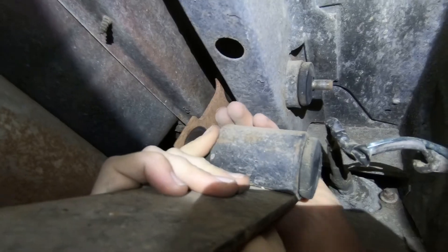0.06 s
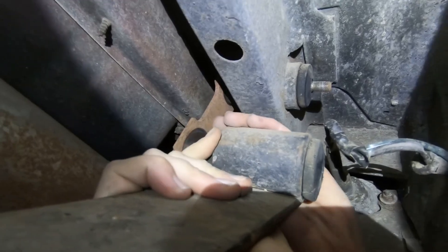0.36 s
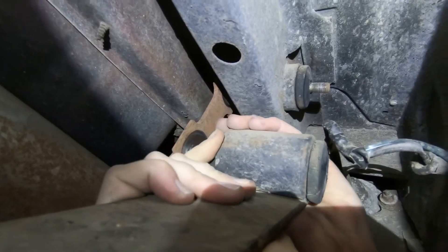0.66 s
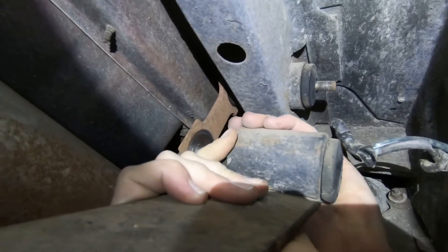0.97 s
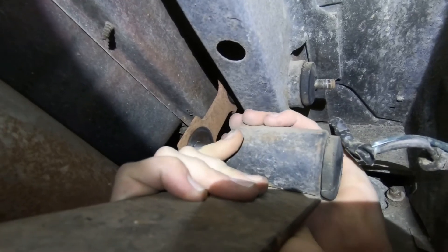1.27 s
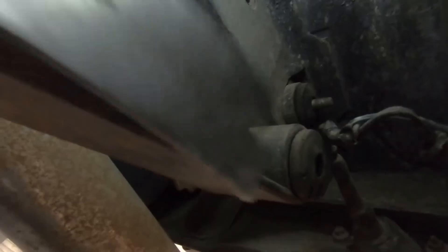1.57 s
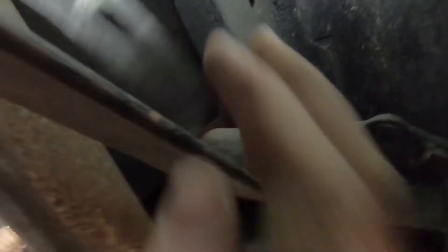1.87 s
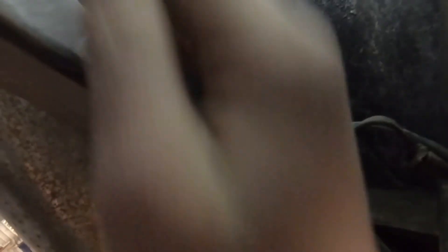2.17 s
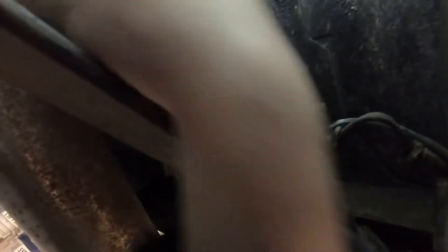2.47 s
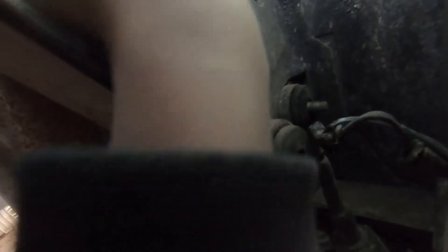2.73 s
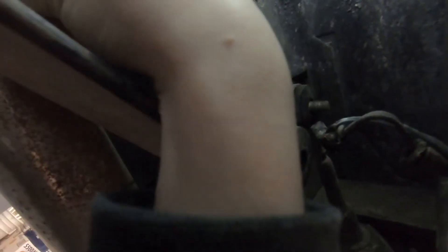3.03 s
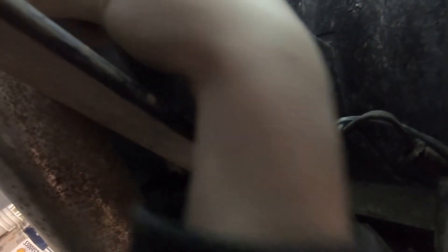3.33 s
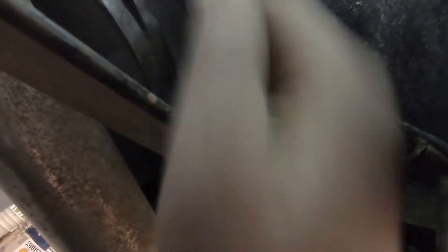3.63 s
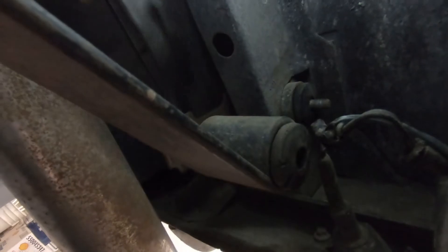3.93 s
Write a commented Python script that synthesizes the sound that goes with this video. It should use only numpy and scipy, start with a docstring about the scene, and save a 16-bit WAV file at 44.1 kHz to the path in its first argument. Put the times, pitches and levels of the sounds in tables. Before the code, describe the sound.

A rubber-mounted metal part creaks close by, louder on the right, in raspy bursts with soft thuds around 0.3 and from 0.6 to 1 second, then trails off. At 1.6 seconds the sound turns centred, with a dull garage rush and a clear, slowly fading tone. Steel clanks near 1.7, 1.9, 2.2 and 2.5 seconds, and thin, squeaky scrapes come and go until about 4 seconds.

```python
"""Under a car in a garage, hands twist a rubber-mounted metal part. Stick-slip friction makes it creak
in bursts, louder on the right, and it thuds against its bracket. Then the scene jumps to a louder, mono
stretch: steel parts scrape and clank, their modes driven by friction and impact, over the dull rush
of the garage, while one clear tone slowly dies away."""
import sys
import numpy as np
from scipy import signal
from scipy.fft import rfft, irfft, next_fast_len
from scipy.io import wavfile
from scipy.ndimage import uniform_filter1d, map_coordinates

SR = 44100
rng = np.random.default_rng(int(sys.argv[2]) if len(sys.argv) > 2 else 0)


def store_wav(level_fs):
    """Save 16-bit WAV to argv[1]."""
    pcm = np.round(np.clip(np.atleast_2d(level_fs), -1, 1) * 32767)
    wavfile.write(sys.argv[1], SR, pcm.T.astype(np.int16))


N = 176400

CUT_S, CUT_FADE_S = 1.593, 0.01  # where the second stretch begins
# spectrum of the rasp that one slip excites: f/Hz, level/dB
RASP_SPECTRUM = [(650, -54), (1100, -19.5), (1360, -16.5), (1530, -6.5), (1670, -15.5), (1810, -13.5),
                 (2080, -1), (2320, -3), (2580, -11.5), (2840, -2), (3500, -0.5), (3980, -3), (4250, -9.5),
                 (5180, -3.5), (5500, 2.5), (7900, -17), (8500, -34.5), (8800, -56.5), (12500, -84.5)]


def amp(db):
    """Decibels to amplitude ratio."""
    return 10 ** (np.asarray(db) / 20)


def unit(x):
    """Scale to rms 1."""
    return x / np.sqrt(np.mean(x ** 2) + 1e-20)


def along(points, hz):
    """Interpolate (f/Hz, value) points on a logarithmic frequency axis."""
    f, v = np.transpose(points)
    return np.interp(np.log(hz + 1), np.log(f + 1), v)


def curves(rows):
    """Interpolate each column after t/s to one value per sample."""
    s, *cols = np.transpose(rows)
    return [np.interp(np.arange(N) / SR, s, c) for c in cols]


def wobble(rate):
    """Smooth random modulation with rate knots a second."""
    return map_coordinates(rng.standard_normal(int(N * rate / SR) + 4), [np.arange(N) * rate / SR])


def filtered(x, gain):
    """Minimum-phase filter: folding the cepstrum makes the response gain(f) causal."""
    m = 2 * next_fast_len(x.shape[-1] // 2 + 4096)
    cepstrum = irfft(np.log(np.maximum(gain(np.fft.rfftfreq(m, 1 / SR)), 1e-6)), m)
    cepstrum[..., 1:m // 2] *= 2
    cepstrum[..., m // 2 + 1:] = 0
    return irfft(rfft(x, m) * np.exp(rfft(cepstrum)), m)[..., :x.shape[-1]]


def coloured(x, points):
    """Spectral shaping by (f/Hz, level/dB) points, rolled off beyond their ends, at rms 1."""
    skirts = lambda hz: 1 / (1 + (points[0][0] / (hz + 1) / 1.3) ** 6 + (hz / points[-1][0] / 1.3) ** 6)
    return unit(filtered(x, lambda hz: amp(along(points, hz)) * skirts(hz)))


def add(track, s, x):
    """Superpose x on the track at time s."""
    i = round(s * SR)
    n = min(x.shape[-1], N - i)
    track[..., i:i + n] += x[..., :n]


def handling(tone_hz):
    """Friction noise of skin on the part, over the quiet garage and its faint tone."""
    # the room's background: t/s, level/dB; its spectrum: f/Hz, level/dB
    room_levels = [(0, -49.5), (.25, -53), (.5, -48), (1.15, -54), (1.6, -54)]
    room_spectrum = [(110, -43), (230, 1), (310, -2), (410, -6), (550, -18.5), (720, -13), (860, -19),
                     (1300, -17), (1800, -28), (3500, -35)]
    # rubbing hands: t/s, level/dB; their spectrum: f/Hz, level/dB
    rub_levels = [(0, -57.5), (.22, -56), (.42, -51), (.58, -54.5), (.9, -54), (1.14, -66.5), (1.25, -62),
                  (1.36, -71.5), (1.475, -54), (1.51, -69), (1.6, -70.5)]
    rub_spectrum = [(500, -19.5), (1450, 0.5), (1650, -2.5), (2020, 5), (2400, -2), (3800, -7.5),
                    (5200, -6), (5750, -1), (6700, -9.5), (9000, -34)]
    room_noise = rng.standard_normal((2, N)) + 0.54 * rng.standard_normal(N)  # partly coherent
    room = amp(curves(room_levels)[0]) * coloured(room_noise, room_spectrum)
    rub_db = curves(rub_levels)[0] + 1.4 * wobble(90)
    rub = amp(rub_db) * coloured(rng.standard_normal((2, N)), rub_spectrum)
    return room + rub + amp(-63) * np.sin(2 * np.pi * tone_hz * np.arange(N) / SR)


def diffuse(t60, incoherence=0.64):
    """Diffuse field: spectrally flat decaying noise of energy near 1, much alike left and right."""
    t = np.arange(SR // 3) / SR
    noise = rng.standard_normal(len(t)) + incoherence * rng.standard_normal((2, len(t)))
    spectrum = rfft(noise * amp(-60 * t / t60))
    spectrum /= np.sqrt(uniform_filter1d(np.abs(spectrum) ** 2, size=90, axis=1))
    tail = irfft(spectrum, len(t)) * np.clip((t[-1] - t) / t[-1], 0, 1) ** 2
    return tail / np.linalg.norm(tail[0])


def ringing(modes, t, scatter_db=1):
    """Free vibration of damped modes (f/Hz, level/dB, T60/s), excited a little differently each time."""
    return sum(amp(db + scatter_db * rng.standard_normal() - 60 * t / t60) * np.sin(2 * np.pi * hz * t)
               for hz, db, t60 in modes)


def slip_response(spectrum, t60, modes=(), mode_t60=0.054):
    """Impulse response to one slip: a direct click, the underbody's echo and any modes of the part."""
    response = diffuse(t60) + amp(-14) * diffuse(t60=0.21)
    t = np.arange(response.shape[1]) / SR
    response[:, 0] += 0.64  # the click reaches both sides alike
    if modes:
        ring = unit(ringing([(hz, db, mode_t60) for hz, db in modes], t))
        response += amp(-17) * ring / np.sqrt(len(t))
    return coloured(response, spectrum) / np.sqrt(len(t))


def creaks(jitter=0.4, scatter_db=2.5):
    """Stick-slip friction: uneven impulse trains from the rubber make the part rasp and groan."""
    # bursts of slipping: t/s, length/s, rasp level/dB, groan level/dB
    bursts = [(0.272, 0.0024, -41, -53), (0.282, 0.0071, -38.5, -43), (0.295, 0.0083, -30.5, -46),
              (.307, 0.014, -19.5, -30.5), (0.326, 0.0038, -22, -34.5), (.333, 0.012, -33, -35.5),
              (0.346, 0.016, -18.5, -34.5), (0.36, 0.0064, -27, -36), (0.371, 0.0094, -44.5, -34),
              (0.614, 0.0039, -32, -40.5), (0.6284, 0.005, -19, -27.5), (0.635, 0.0083, -21.5, -31),
              (0.644, 0.013, -23.5, -31.5), (0.66, 0.0099, -18, -28), (0.671, 0.016, -15.5, -34.5),
              (0.691, 0.006, -24, -33), (0.701, 0.022, -34.5, -37.5), (0.718, 0.0016, -32.5, -47),
              (0.7826, .004, -16, -38.5), (0.789, 0.0056, -26.5, -43.5), (0.8004, 0.0037, -13.5, -37),
              (0.825, .011, -23, -40.5), (0.945, 0.0039, -22.5, -36.5), (0.99, 0.018, -41.5, -49),
              (0.994, 0.0026, -32.5, -44)]
    # modes of the metal part: f/Hz, level/dB
    part_modes = [(2085, -1), (3061, -1), (3235, 1), (3434, 1), (3532, 1), (3840, -1), (4025, 1), (5441, 1),
                  (5562, 0), (5832, -2), (6067, -2)]
    # spectrum of the groan: f/Hz, level/dB
    groan_spectrum = [(200, -35.5), (330, -16.5), (500, -7.5), (680, -1), (790, 3), (920, -7), (1100, -17),
                      (1600, -42.5)]
    out = np.zeros((2, N))
    for s, length, rasp_db, groan_db in bursts:
        slips_per_s = 1300 * 2 ** ((rasp_db + 20) / 22)  # harder bursts slip faster
        gap_draws, size_draws = rng.standard_normal((2, 64))
        gaps = np.exp(jitter * gap_draws) / slips_per_s
        onsets = np.cumsum(gaps) - gaps[0]
        inside = onsets < length
        slips = np.bincount((onsets[inside] * SR).astype(int), amp(scatter_db * size_draws[inside]))
        rasp = slip_response(RASP_SPECTRUM, t60=0.021, modes=part_modes)
        groan = slip_response(groan_spectrum, t60=0.07)
        for response, db in ((rasp, rasp_db), (groan, groan_db)):
            burst = signal.fftconvolve(slips[None], response, axes=1)
            add(out, s, amp(db) * burst * np.sqrt(2 * length * SR / np.sum(burst ** 2)))
    return out


def thuds(attack_s=0.0056):
    """Soft impacts excite low, damped modes as the part gives way in its mount."""
    # knocks against the bracket: t/s, level/dB
    knocks = [(0.294, -32), (.344, -24), (.396, -33.5), (0.627, -29.5), (0.657, -20.5), (0.667, -23.5),
              (0.718, -24), (.744, -35), (0.777, -32), (0.795, -27), (.957, -36)]
    # modes of the mounted part: f/Hz, level/dB, T60/s
    mount_modes = [(221, -12, 0.19), (265.9, 2, 0.15), (291.4, -3.5, 0.14), (415.6, -9.5, 0.091)]
    out, t = np.zeros(N), np.arange(SR // 3) / SR
    for s, db in knocks:
        add(out, s, amp(db) * ringing(mount_modes, t) * (1 - np.exp(-t / attack_s)))
    return out


def slow_creak():
    """Relaxation oscillation: the rubber creeps to rest in slips that come ever more slowly."""
    # course of the creep: t/s, slip rate/Hz, level/dB
    creep = [(1.003, 380, -49.5), (1.03, 290, -45.5), (1.06, 254, -48.5), (1.09, 220, -49),
             (1.11, 170, -62)]
    rate, db = curves(creep)
    t = np.arange(N) / SR
    slip_count = np.floor(np.cumsum(rate * np.exp(0.07 * wobble(170))) / SR)
    slips = np.diff(slip_count, prepend=0) * (t > creep[0][0]) * (t < creep[-1][0])
    slips *= amp(db + 1.1 * rng.standard_normal(N)) * np.sqrt(SR / rate)
    return signal.fftconvolve(slips[None], slip_response(RASP_SPECTRUM, t60=0.014), axes=1)[:, :N]


def fading_tone(hz, start_db=-28.5, fall_db_per_s=5.5):
    """Exponential decay of one slightly wavering tone, like a lightly damped steel part."""
    t = np.arange(N) / SR
    db = start_db - fall_db_per_s * (t - CUT_S) - 0.22 * wobble(6.1)
    return amp(db) * np.sin(2 * np.pi * hz * t + 0.14 * wobble(9.3))


def garage_rush():
    """Broadband ambient noise: a dull, uneven rumble with a steady hiss above it."""
    # course of the rumble: t/s, level/dB
    rumble_levels = [(1.6, -41), (1.68, -31), (1.8, -36.5), (2.7, -36), (2.9, -33.5), (3.15, -38),
                     (3.62, -34.5), (4, -37)]
    # spectra of rumble and hiss: f/Hz, level/dB
    rumble_spectrum = [(120, -31.5), (185, -9), (218, 5), (250, -3), (290, 3), (335, -1), (364, -1.5),
                       (400, -7.5), (490, -5.5), (555, -4.5), (640, -7), (760, -10.5), (880, -4),
                       (960, -10), (1120, -11), (1350, -17.5), (1780, -19.5), (2100, -30)]
    hiss_spectrum = [(1000, -7.5), (1700, 7), (2700, -3), (3400, -3.5), (4400, 6), (5000, 5), (6400, -2.5),
                     (7800, -3), (8600, -19.5), (9500, -44)]
    rumble_db = curves(rumble_levels)[0] + 0.68 * wobble(25)
    rumble = amp(rumble_db) * coloured(rng.standard_normal(N), rumble_spectrum)
    return rumble + amp(-51.5) * coloured(rng.standard_normal(N), hiss_spectrum)


def singing(hz, flutter_per_s=85, steady=0.55):
    """Self-excited vibration: friction sustains one mode, unsteady in amplitude and phase."""
    shimmer = (wobble(flutter_per_s) + 1j * wobble(flutter_per_s)) / np.sqrt(2) + steady
    return np.abs(shimmer) * np.sin(2 * np.pi * hz * np.arange(N) / SR + np.angle(shimmer))


def scrapes(grain_db=2, contact_swing_db=4):
    """Sliding friction keeps steel singing; each stroke hisses, swells it and squeaks on one mode."""
    # strokes: middle t/s, half length/s, hiss level/dB, squeak f/Hz, squeak level/dB
    strokes = [(1.697, .007, -39, 5000, -41), (1.682, .02, -44, 5548, -37.5),
               (1.68, .011, -51, 7400, -39.5), (1.873, .013, -58, 2449, -48), (2.188, .01, -60, 2449, -53),
               (2.66, .038, -54, 6842, -49.5), (2.65, .05, -62, 3205, -50), (2.77, .028, -50, 4350, -45),
               (2.88, .05, -50.5, 7290, -57), (3.25, .04, -57, 6845, -60), (3.38, .07, -53, 6870, -63),
               (3.52, .035, -59, 6842, -62), (4.0, .028, -45, 4950, -46)]
    # spectrum of the friction noise: f/Hz, level/dB
    grit_spectrum = [(1500, -18), (3400, -12.5), (4400, 0.5), (5400, -3), (6500, -5.5), (7400, -5.5),
                     (9600, -32)]
    # friction-driven modes: f/Hz, level in light contact/dB, level of a stroke's swell/dB
    rubbed_modes = [(2449, -73, -59), (4335, -64, -68), (4877, -62, -63), (6850, -78, -65),
                    (7290, -74, -64)]
    t = np.arange(N) / SR
    sliding, hiss_gain, squeaks = np.zeros((3, N))
    for s, half_length, hiss_db, hz, squeak_db in strokes:
        push = np.exp(-((t - s) / half_length) ** 4)
        sliding = np.maximum(sliding, push)
        hiss_gain += amp(hiss_db) * push
        squeaks += amp(squeak_db) * push * singing(hz)
    grit = hiss_gain * coloured(rng.standard_normal(N) * amp(grain_db * wobble(700)), grit_spectrum)
    out = grit + squeaks
    for hz, light_db, stroke_db in rubbed_modes:
        drive = amp(light_db + contact_swing_db * wobble(1.8)) + amp(stroke_db) * sliding
        out += drive * singing(hz)
    return out


def clanks(favour_db=6, clang_top_hz=1500, attack_s=0.00081):
    """Impact excitation of steel: knock, clang, ring and crash; the point struck favours one mode."""
    # blows: t/s, clang level/dB, ring level/dB, crash level/dB, favoured f/Hz
    blows = [(1.71, -20.5, -34.5, -33, 4335), (1.717, -21, -46.5, -35, 4877), (1.736, -26, -49.5, -46, 998),
             (1.854, -20, -44, -40.5, 1120), (2.176, -22.5, -49, -52, 1254), (2.526, -16, -28, -31.5, 3101),
             (2.534, -30, -31.5, -31.5, 5561), (2.561, -33, -39.5, -42, 2449)]
    # modes of the steel: f/Hz, level/dB, T60/s
    steel_modes = [(872, -3, .3), (897, -4, .22), (998, -9, .25), (1030, -3, .19), (1120, -12, .13),
                   (1254, -13.5, .5), (1803, -5, .35), (2121, -8, .45), (2449, -8, .38), (3101, -8, .26),
                   (3205, -7, .45), (4335, -10, .5), (4877, -6, .3), (5443, 0, .28), (5561, -7, .25),
                   (6255, -9, .16), (6842, -17, .4), (7262, -9, .2)]
    # noise spectra of the low clang and the bright crash: f/Hz, level/dB
    clang_spectrum = [(250, -22.5), (770, -10), (880, 5.5), (1100, 1.5), (1300, -7), (2000, -40)]
    crash_spectrum = [(900, -13.5), (1400, 8), (2100, -4), (3700, -6.5), (5200, 6), (6800, -11.5),
                      (7500, -4), (9600, -38.5)]
    knock_t60, clang_t60, crash_t60 = 0.038, 0.43, 0.15
    out, t = np.zeros(N), np.arange(SR) / SR
    for s, clang_db, ring_db, crash_db, favoured_hz in blows:
        favoured = min(steel_modes, key=lambda mode: abs(mode[0] - favoured_hz))[0]
        modes = [(hz, db + favour_db * (hz == favoured), t60) for hz, db, t60 in steel_modes]
        clang_noise, crash_noise, knock_noise = rng.standard_normal((3, len(t)))
        dull_noise = coloured(knock_noise, [(1150, -0.5), (2000, -5.5)])
        knock = amp(ring_db + 2.5 - 60 * t / knock_t60) * dull_noise
        clang = ringing([m for m in modes if m[0] < clang_top_hz], t) / 2
        clang += amp(-12 - 60 * t / clang_t60) * coloured(clang_noise, clang_spectrum)
        ring = ringing([m for m in modes if m[0] >= clang_top_hz], t) / 2
        crash = amp(crash_db - 60 * t / crash_t60) * coloured(crash_noise, crash_spectrum)
        blow = knock + amp(clang_db) * clang + amp(ring_db) * ring + crash
        add(out, s, blow * (1 - np.exp(-t / attack_s)))
    return out


def to_the_right(stereo, right_lag_s=0.00006):
    """Level and time differences: the right channel is louder at constant total power, and lags."""
    # stereo balance: f/Hz, left minus right level/dB
    balance = [(180, -3.5), (550, -10.5), (1300, -2), (3800, -2.5), (4500, -7.5), (5600, -13.5),
               (6600, -10), (7600, -3), (8700, 0)]

    def pan_gains(hz):
        gains = amp(along(balance, hz) * np.array([[0.5], [-0.5]]))
        return gains / np.sqrt(np.mean(gains ** 2, axis=0))
    left, right = filtered(stereo, pan_gains)
    return np.array([left, map_coordinates(right, [np.arange(N) - right_lag_s * SR])])


def scene():
    """Superposition: the creaking part on the right, then a quick crossfade to centred steel work."""
    tone_hz = 691.4
    twisting = to_the_right(creaks() + slow_creak() + thuds() + handling(tone_hz))
    steel_work = clanks() + scrapes() + fading_tone(tone_hz) + garage_rush()
    fade = np.clip((np.arange(N) / SR - CUT_S) / CUT_FADE_S, 0, 1)
    return twisting * (1 - fade) + steel_work * fade


def record(dry):
    """Band limiting: Butterworth responses drop the bass and cut the top treble steeply."""
    low_cut_hz, top_hz = 183.4, 9400
    thin = filtered(dry, lambda hz: 1 / np.sqrt(1 + (low_cut_hz / (hz + 1)) ** 14))
    return filtered(thin, lambda hz: 1 / np.sqrt(1 + (hz / top_hz) ** 80))


dry = scene()
out = record(dry)
store_wav(out)
```